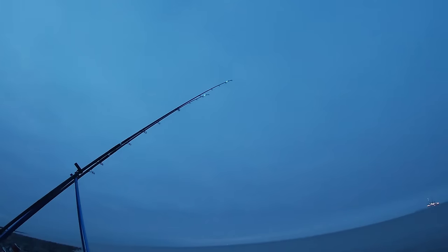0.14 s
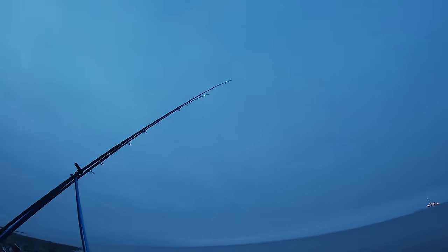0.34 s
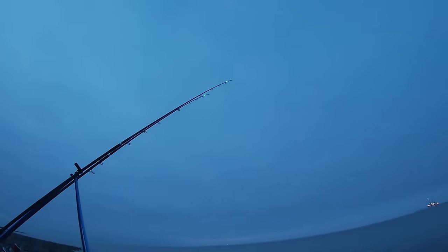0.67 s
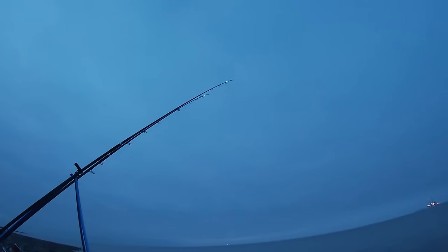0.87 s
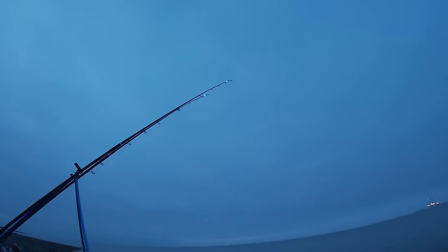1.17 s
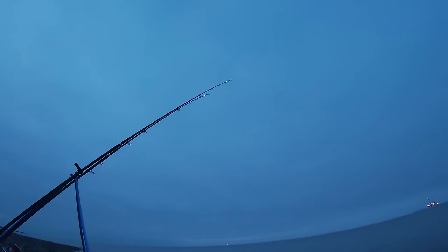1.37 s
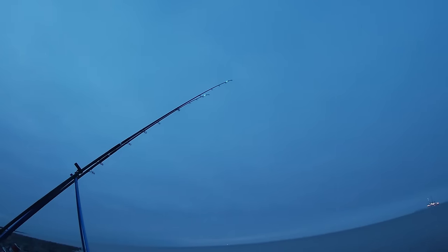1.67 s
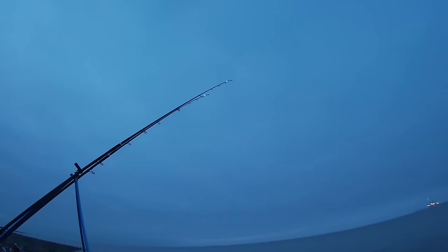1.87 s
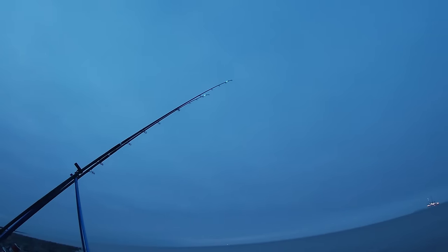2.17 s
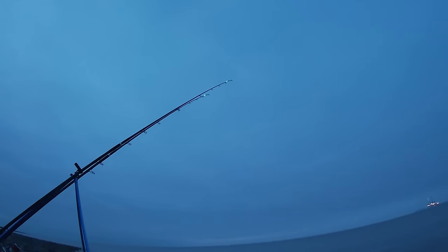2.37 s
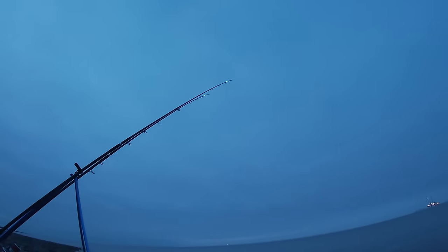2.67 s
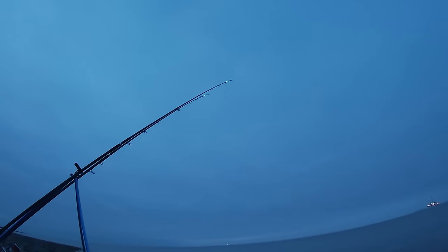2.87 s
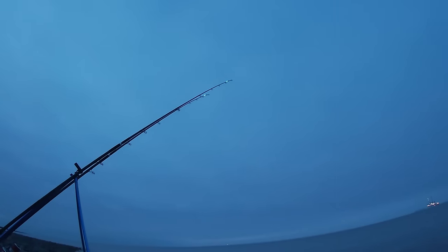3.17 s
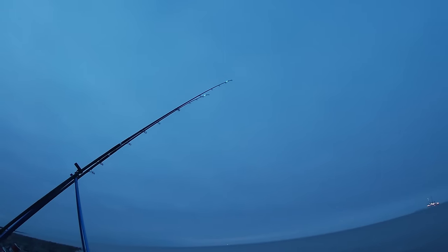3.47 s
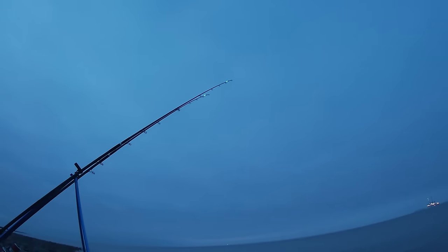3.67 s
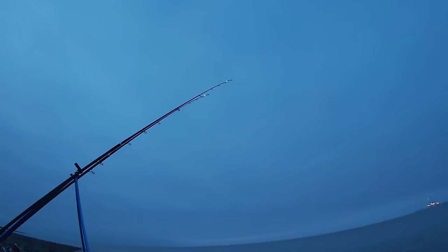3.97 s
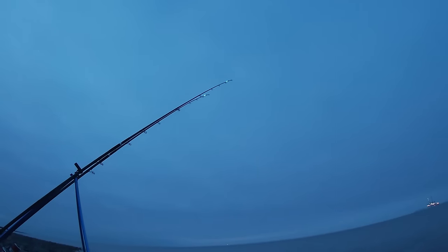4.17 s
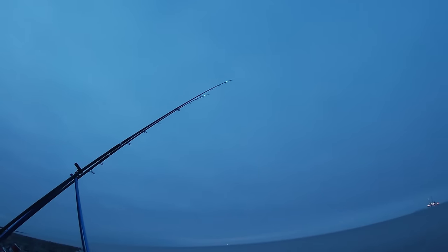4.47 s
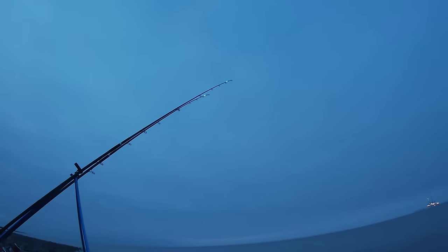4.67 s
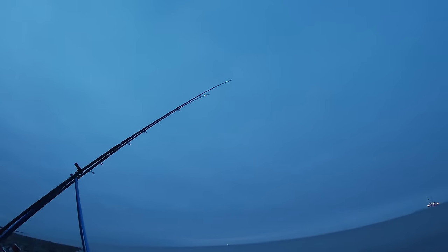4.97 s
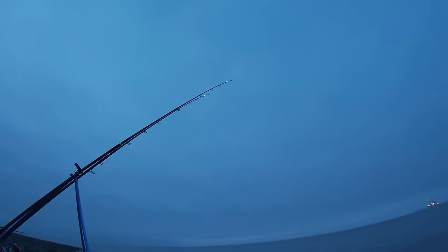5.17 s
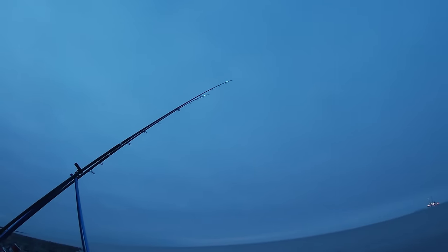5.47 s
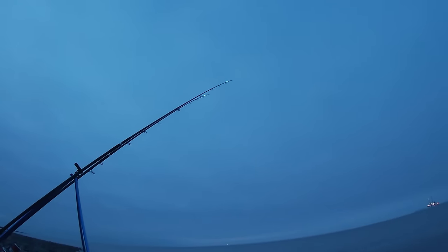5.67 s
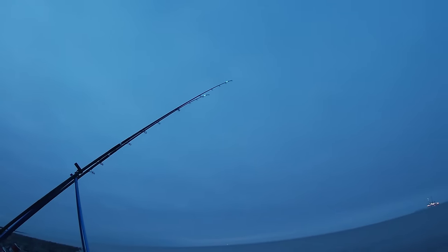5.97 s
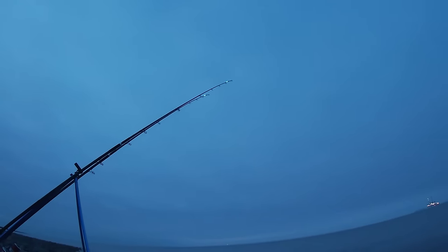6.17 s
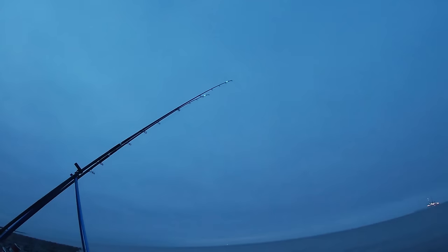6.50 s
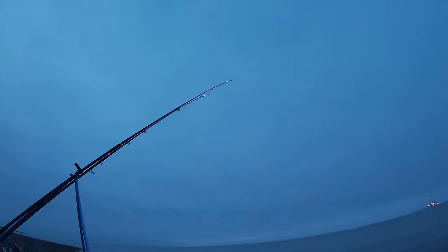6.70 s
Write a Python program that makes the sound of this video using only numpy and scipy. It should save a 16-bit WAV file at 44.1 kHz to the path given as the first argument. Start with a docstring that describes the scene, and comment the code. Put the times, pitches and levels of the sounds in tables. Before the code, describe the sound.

Outdoors on a stony shore, small waves rush in close to a small microphone, slapping stones, fizzing and draining. Drops plink, pebbles tick, and trapped air gurgles upward. Strong low wind rumbles over the first two seconds, then eases; a heavy thump hits the microphone midway, and the water swells again before calming.

```python
"""Small waves lap on a stony shore close in front of a small microphone.
Each wave is a rush of coloured noise and ringing bubbles that rises to a crest, then drains away.
Wavelets slap stones as short noise bursts; near drops, and probably pebbles, tick, ring and scatter.
Trapped air gurgles upward in pitch as a gliding, wavering resonance.
Behind the water, low gusts of noise and a few decaying thumps rumble across the microphone."""
import sys
import numpy as np
from scipy import signal
from scipy.fft import rfft, irfft, next_fast_len
from scipy.io import wavfile
from scipy.ndimage import uniform_filter1d, map_coordinates

SR = 44100
rng = np.random.default_rng(int(sys.argv[2]) if len(sys.argv) > 2 else 0)


def bounce(signal):
    """Save signal as a 16-bit WAV file at the path given by the first command-line argument."""
    frames = np.transpose(np.atleast_2d(signal))
    limited = np.clip(frames, -1, 1)
    pcm = np.round(limited * 32767).astype(np.int16)
    wavfile.write(sys.argv[1], SR, pcm)


N = 301644  # length [samples]


def surf():
    """Levels in dB of the churning water and of its spray: each wave rises to its crest, then drains away."""
    # small waves running up the shore:
    # (crest time [s], rise [s], churn level [dB], spray level over the churn, before its mix [dB])
    shore_waves = [(0.03, 0.28, -46, -6.5), (0.36, 0.063, -46.5, -2.5), (0.569, 0.23, -43.5, -3.5),
                   (0.78, 0.11, -46, -2), (1.23, 0.089, -47.5, -3), (1.55, 0.21, -50, -1),
                   (2.16, 0.17, -52, -1.5), (2.42, 0.2, -51.5, -11.5), (2.85, 0.33, -53.5, -4.5),
                   (3.199, 0.15, -57, -2), (3.37, 0.11, -51, -6), (3.701, 0.15, -50, -2),
                   (3.99, 0.18, -45.5, -4), (4.29, 0.23, -45.5, -2), (4.579, 0.08, -52, -3),
                   (4.82, 0.075, -48, -2), (5.09, 0.29, -46, -3), (5.78, 0.19, -49.5, -2),
                   (6.14, 0.075, -58, -4), (6.501, 0.11, -56, -2.5), (6.74, 0.08, -59, -2)]
    churn_drain, spray_drain = 15, 23.5  # dB per second
    far_churn_db, far_spray_db = -59.5, -61  # the rest of the shore
    churn, spray = [], []
    for crest, rise, db, over_db in shore_waves:
        churn.append((db, swell(crest - rise, rise, rise, churn_drain)))
        spray.append((db + over_db, swell(crest - rise, rise, rise, spray_drain)))
    return level(far_churn_db, churn), level(far_spray_db, spray)


def wash(churn_db, spray_db):
    """Churning water rushes with large bubbles; spray fizzes with tiny ones and crackles with droplets."""
    # spectrum of the churning water: (frequency [Hz], relative density [dB per Hz])
    churn_spectrum = [(120, -18), (250, -12), (400, -6.5), (560, -1.5), (720, -2.5), (1500, 0.5),
                      (2400, -3.5), (3500, -9), (6000, -20), (12000, -84)]
    # spectrum of the spray: (frequency [Hz], relative density [dB per Hz])
    spray_spectrum = [(1200, -36), (2400, -7), (3500, -2), (5000, -3.5), (6600, -5.5), (10000, -5.5),
                      (16000, -6.5)]
    large = bubbles(rate=480, low_hz=621.4, high_hz=4160, cycles=35, rise=0.22, spread_db=3.5, size=1100)
    small = bubbles(rate=800, low_hz=2240, high_hz=10210, cycles=33, rise=0.1, spread_db=4.5, size=420)
    crackle = bubbles(rate=260, low_hz=2000, high_hz=10000, cycles=5.5, rise=0.11, spread_db=4.0, size=100)

    churn = amp(-3.5) * rush(churn_spectrum)
    churn += amp(-2.5) * unit(colour(large, churn_spectrum))
    spray = amp(-0.5) * rush(spray_spectrum)
    spray += amp(-1) * unit(colour(small, spray_spectrum))
    spray += amp(-8.5) * unit(colour(crackle, spray_spectrum))

    slosh_db = .9 * wobble(22)  # shared by churn and spray
    churn *= amp(churn_db + slosh_db + 1.3 * wobble(60))
    spray *= amp(spray_db + slosh_db + 2.03 * wobble(110))
    return churn + spray


def bubbles(rate, low_hz, high_hz, cycles, rise, spread_db, size):
    """A swarm of ringing bubbles, rms 1: most are faint, and each climbs in pitch as it nears the surface."""
    # one row per bubble, rate bubbles a second, each size samples long
    when, pitch, life, strength = rng.random((int(rate * N / SR), 4)).T[:, :, None]
    hz = low_hz * (high_hz / low_hz) ** pitch
    t60 = cycles * (.5 + life) / hz
    t = np.arange(size) / SR
    loudness = amp(-spread_db * np.log(1 - .985 * strength))
    onset = 1 - np.exp(-2 * hz * t)
    phase = 2 * np.pi * hz * t * (1 + rise * t / t60 / 2)
    ring = loudness * fade(t, t60) * np.sin(phase) * onset
    ring *= np.sqrt(hz / low_hz)  # small bubbles are brief but sharp
    places = (when * N).astype(int) + np.arange(size)
    return unit(np.bincount(places.ravel(), ring.ravel(), N)[:N])


def slaps():
    """A wavelet hits a stone and traps a cloud of bubbles all at once: a broad, quickly dying burst."""
    # wavelets slapping the stones: (time [s], level before trim [dB], centre frequency [Hz])
    stone_slaps = [(0.055, -44.5, 416), (0.475, -42.5, 487), (0.598, -35, 970), (0.768, -33, 1140),
                   (1.012, -37.5, 903), (1.19, -36.5, 1017), (1.219, -33.5, 1980), (2.155, -49.5, 450),
                   (2.385, -55, 450), (2.949, -49, 470), (3.99, -44, 470), (4.183, -41, 1780),
                   (4.335, -38, 1513), (6.08, -51.5, 420), (6.496, -47, 435), (6.553, -48.5, 690)]
    trim_db = -1.0
    out, t = np.zeros(N), np.arange(SR // 4) / SR
    for s, db, hz in stone_slaps:
        band = signal.butter(2, [hz / 1.6, hz * 1.6], "band", fs=SR, output="sos")
        burst = unit(signal.sosfilt(band, rng.standard_normal(len(t))))
        t60 = 0.13 * np.sqrt(1000 / hz)  # 0.13 s at 1000 Hz; larger, lower clouds ring longer
        add(out, s, amp(db + trim_db) * burst * fade(t, t60))
    return out


def drops(spray_db):
    """A drop, bursting bubble or, above 5 kHz, probably a pebble: a tick, a ring and a short scatter."""
    # the nearest drops, bursting bubbles and, above 5 kHz, probably clicking pebbles:
    # (time [s], ring level before trim [dB], starting pitch [Hz],
    # ring t60 before stretch [s], tick level before trim [dB])
    near_drops = [(0.2297, -35.5, 1075, 0.064, -47.5), (0.324, -35, 5160, 0.015, -42),
                  (0.3732, -31.5, 2850, 0.036, -47), (0.612, -31, 8530, 0.0059, -38.5),
                  (0.7164, -31, 3180, 0.035, -55.5), (0.757, -23.5, 3710, 0.0091, -47),
                  (1.012, -33, 1000, 0.017, -40), (1.2235, -28.5, 1983, 0.04, -48),
                  (1.2374, -26, 4640, 0.0097, -28.5), (1.2816, -29.5, 1170, 0.019, -47),
                  (1.369, -42, 3370, 0.02, -41.5), (1.939, -38, 1050, 0.037, -39.5),
                  (2.465, -37, 2430, 0.033, -51), (2.7066, -37, 8560, 0.005, -35.5),
                  (2.95, -37, 3747, 0.018, -51), (3.0855, -30.5, 4160, 0.013, -55.5),
                  (3.1, -25, 3670, 0.005, -52), (3.1659, -36.5, 8124, 0.031, -44),
                  (4.0568, -28, 6000, 0.012, -48), (4.1324, -18.5, 2290, 0.011, -35.5),
                  (4.1837, -26.5, 2004, 0.025, -44.5), (4.1892, -29.5, 1370, 0.025, -52.5),
                  (4.291, -25, 2740, 0.0094, -34.5), (4.773, -37.5, 3933, 0.021, -47),
                  (5.241, -35, 1696, 0.052, -57), (5.63, -34.5, 2160, 0.018, -51.5),
                  (5.773, -30, 8760, 0.0041, -36), (5.836, -33, 1604, 0.027, -55),
                  (6.032, -37.5, 2750, 0.029, -55), (6.1089, -36, 6050, 0.017, -42),
                  (6.2053, -35.5, 1515, 0.034, -51.5), (6.4407, -29, 8380, 0.0059, -38),
                  (6.4663, -37.5, 1210, 0.036, -36.5), (6.749, -28.5, 6700, 0.0048, -44)]
    # fainter ones, drawn between a low and a high row: the same columns without the time
    stray_limits = [(-45.5, 1290, 0.018, -53), (-33, 7000, 0.021, -40)]
    strays_per_s = 7
    ring_trim_db, tick_trim_db, t60_stretch = -1.0, 9.5, 1.13
    out, t = np.zeros(N), np.arange(SR // 14) / SR
    snap = fade(t, .0045)
    scatter = amp(-15) * fade(t, .035)
    for s, ring_db, hz, t60, tick_db in near_drops + strays(strays_per_s, stray_limits, spray_db):
        phase = 2 * np.pi * hz * t * (1 + 1.3 * t)
        # two weaker partials, one lower and one higher, roughen the ring
        lower, higher = rng.uniform([.75, 1.08], [.92, 1.35])
        ring = np.sin(phase) + 0.34 * np.sin(lower * phase) + 0.45 * np.sin(higher * phase)
        ring *= fade(t, t60_stretch * t60) * (1 - np.exp(-4 * hz * t))
        tick, splash = rng.standard_normal((2, len(t)))
        splash = signal.lfilter([.5], [1, -.5], splash)  # far droplets are duller
        impact = tick * snap + splash * scatter
        add(out, s, amp(ring_db + ring_trim_db) * ring + amp(tick_db + tick_trim_db) * impact)
    return out


def gurgles(churn_db):
    """Water squeezes air between stones: a wavering resonance glides upward as the pocket shrinks."""
    # water filling gaps between stones: (time [s], length [s], starting pitch [Hz], level [dB])
    stone_gurgles = [(0.328, 0.043, 435, -47), (0.462, 0.054, 397, -43), (0.529, 0.056, 410, -45),
                     (0.71, 0.032, 642, -41.5), (1.003, 0.033, 593, -42), (1.503, 0.036, 499, -47),
                     (1.518, 0.025, 858, -36), (1.735, 0.049, 624, -46), (1.769, 0.035, 1160, -40),
                     (2.787, 0.052, 800, -49.5), (3.354, 0.043, 398, -46.5), (3.585, 0.035, 628, -44),
                     (3.633, 0.063, 461, -48), (3.932, 0.054, 1022, -41.5), (4.439, 0.055, 472, -46.5),
                     (4.539, 0.055, 534, -40.5), (4.592, 0.038, 874, -43.5), (4.785, 0.055, 679, -43),
                     (4.853, 0.059, 238, -43.5), (4.933, 0.044, 385, -49), (5.193, 0.072, 556, -45.5),
                     (5.571, 0.089, 261, -50), (5.625, 0.042, 621, -43), (5.891, 0.047, 501.5, -42)]
    # fainter pockets, drawn between a low and a high row: the same columns without the time
    stray_limits = [(.03, 371.6, -54), (.06, 1153, -55)]
    strays_per_s, octaves_per_s = 7, 8.28
    steady, rough = 0.74, 0.46  # the steady and the wavering share of the resonance
    out = np.zeros(N)
    ripple = steady + rough * (wobble(220) + 1j * wobble(220))
    for s, length, start_hz, db in stone_gurgles + strays(strays_per_s, stray_limits, churn_db):
        u = np.linspace(0, 1, int(length * SR))
        hz = start_hz * 2 ** (octaves_per_s * length * u)
        phase = 2 * np.pi * np.cumsum(hz) / SR
        waver = ripple.take(int(s * SR) + np.arange(len(u)), mode="wrap")
        tone = np.real(np.exp(1j * phase) * waver)
        envelope = np.sqrt(np.abs(np.sin(np.pi * u)))
        add(out, s, amp(db) * envelope * tone)
    return out


def wind():
    """Large eddies sway the air at the microphone, small ones buffet it, and gusts add a higher flutter."""
    # gusts on the microphone: (time [s], length until the fall begins [s], sway level before wobble [dB],
    # buffeting level before trim and lumps [dB], flutter level before lumps [dB])
    mic_gusts = [(-0.05, 0.11, -27.5, -23.5, -45), (0.087, 0.29, -35, -27, -61.5),
                 (0.419, 0.15, -52, -43, -76.5), (0.582, 0.24, -35.5, -42.5, -80),
                 (0.853, 0.13, -30, -26, -46.5), (0.946, 0.15, -34, -20.5, -34),
                 (1.18, 0.11, -31.5, -21, -30), (1.349, 0.08, -34, -28.5, -59.5),
                 (1.531, 0.3, -34, -26.5, -44), (1.813, 0.27, -34.5, -29.5, -50.5),
                 (2.266, 0.18, -38.5, -43, -69), (2.841, 0.057, -44, -43, -70.5),
                 (2.981, 0.52, -44, -49.5, -66), (3.877, 0.25, -49, -57.5, -83),
                 (4.272, 0.29, -35, -37, -67), (4.885, 0.13, -37.5, -37.5, -52),
                 (5.332, 0.18, -40, -52, -76), (5.74, 0.062, -42, -49.5, -65),
                 (5.953, 0.26, -41, -41.5, -62), (6.3, 0.07, -39.5, -36, -54.5),
                 (6.598, 0.26, -41, -50, -61)]
    # spectrum of the sway: (frequency [Hz], relative density [dB per Hz])
    sway_spectrum = [(8, -10), (16, -7), (30, 4), (52, 4.5), (68, 0), (90, -30), (160, -37), (400, -89)]
    # spectrum of the buffeting: (frequency [Hz], relative density [dB per Hz])
    buffet_spectrum = [(40, -25.5), (65, 1), (82, 3), (120, -3.5), (155, -10), (200, -21.5), (270, -34.5),
                       (420, -43), (900, -95)]
    # spectrum of the flutter: (frequency [Hz], relative density [dB per Hz])
    flutter_spectrum = [(110, -22.5), (170, 6.5), (210, 1.5), (270, -9.5), (350, -17), (480, -28.5),
                        (1000, -52)]
    attack_s, release_db_per_s = 0.069, 144
    # the light air between gusts, before the same wobble, trim and lumps
    calm_sway_db, calm_buffet_db, calm_flutter_db = -52, -58, -71.5
    buffet_trim_db = -2.0
    shapes = [swell(s, attack_s, length, release_db_per_s) for s, length, *_ in mic_gusts]
    _, _, sways, buffets, flutters = np.transpose(mic_gusts)
    sway_db = level(calm_sway_db, zip(sways, shapes)) + 3.4 * wobble(24)
    buffet_db = level(calm_buffet_db, zip(buffets, shapes)) + buffet_trim_db
    flutter_db = level(calm_flutter_db, zip(flutters, shapes))
    sway = amp(sway_db) * eddies(sway_spectrum)
    buffet = amp(buffet_db) * eddies(buffet_spectrum)
    flutter = amp(flutter_db) * eddies(flutter_spectrum)
    lumps = amp(2.0 * wobble(35))
    return sway + lumps * (buffet + flutter)


def eddies(points):
    """Turbulent pressure of steady strength, so that the gust levels set its swell."""
    rumble = rush(points)
    return rumble / np.sqrt(np.abs(uniform_filter1d(rumble ** 2, size=3000)) + 1e-6)


def thumps():
    """A thump on the microphone: each mode is a low sine that starts softly and dies away."""
    # thumps on the microphone; the one near 3.33 s has a low and a higher mode:
    # (time [s], level [dB], pitch [Hz], t60 [s])
    mic_thumps = [(3.326, -7, 81.7, 0.098), (3.333, -27.5, 197, 0.049), (6.789, -15.5, 38.1, .35)]
    out, t = np.zeros(N), np.arange(SR // 4) / SR
    for s, db, hz, t60 in mic_thumps:
        onset = 1 - np.exp(-(1.5 * hz * t) ** 2)
        add(out, s, -amp(db) * np.sin(2 * np.pi * hz * t) * fade(t, t60) * onset)
    return out


def swell(s, rise_s, hold_s, fall_db_per_s):
    """Power envelope from time s: a smooth rise, and from hold_s after s a steady fall in dB."""
    t = np.arange(N) / SR - s
    attack = np.sin(np.pi / 2 * np.clip(t / rise_s, 0, 1))
    return (attack * amp(-fall_db_per_s * np.maximum(t - hold_s, 0))) ** 2


def level(floor_db, swells):
    """Level in dB of a floor plus (dB, power envelope) swells, added as powers."""
    return 10 * np.log10(amp(floor_db) ** 2 + sum(amp(db) ** 2 * power for db, power in swells))


def strays(rate, limits, activity_db):
    """Event rows at random times, more often in active water; each column lies between its two limits."""
    low, high = np.array(limits)
    share = np.cumsum(amp(activity_db))
    rows = []
    for u in rng.random((int(rate * N / SR), 1 + len(low))):
        s = np.searchsorted(share, u[0] * share[-1]) / SR
        rows.append((s, *(low + (high - low) * u[1:])))
    return rows


def rush(points):
    """Noise of rms 1 with the given spectrum."""
    return unit(colour(rng.standard_normal(N), points))


def colour(x, points):
    """Causal minimum-phase filter through (Hz, dB) points on a log axis."""
    size = 2 * next_fast_len(N // 2 + SR // 4)
    hz, db = np.transpose(points)
    gain = amp(np.interp(np.log(np.fft.rfftfreq(size, 1 / SR) + 1), np.log(hz + 1), db))
    # folding the cepstrum onto positive time makes the response causal
    cepstrum = irfft(np.log(gain))
    cepstrum[1:size // 2] *= 2
    cepstrum[size // 2 + 1:] = 0
    return irfft(rfft(x, size) * np.exp(rfft(cepstrum)))[:N]


def wobble(rate):
    """A smooth random curve, rate knots a second."""
    knots = rng.standard_normal(int(N * rate / SR) + 4)
    return map_coordinates(knots, [np.arange(N) * rate / SR])


def fade(t, t60):
    """Exponential decay, 60 dB down at t60."""
    return np.exp(-np.log(1000) * t / t60)


def amp(db):
    """Decibels to gain."""
    return 10 ** (np.asarray(db) / 20)


def unit(x):
    """Scale to rms 1."""
    return x / np.sqrt(np.mean(x ** 2) + 1e-20)


def add(track, s, sound):
    """Mix a sound into the track from time s."""
    part = track[max(round(s * SR), 0):][:len(sound)]
    part += sound[:len(part)]


def scene():
    """Water in front, wind on the microphone."""
    churn_db, spray_db = surf()
    water = wash(churn_db, spray_db) + slaps() + drops(spray_db) + gurgles(churn_db)
    return (water + wind() + thumps())[None]


def record(dry):
    """The microphone port colours the treble, and a steep low-pass removes what lies above its band."""
    # the port rings near 8 kHz and is dull above: (frequency [Hz], gain [dB])
    port_response = [(6600, 0.5), (8400, 4.5), (9800, -1.5), (11200, -14), (12500, -17.5), (14500, -20),
                     (15800, -29)]
    top_hz = 15800
    heard = colour(dry[0], port_response)
    return signal.sosfilt(signal.ellip(10, .1, 90, top_hz, fs=SR, output="sos"), heard)[None]


dry = scene()
out = record(dry)
bounce(out)
```